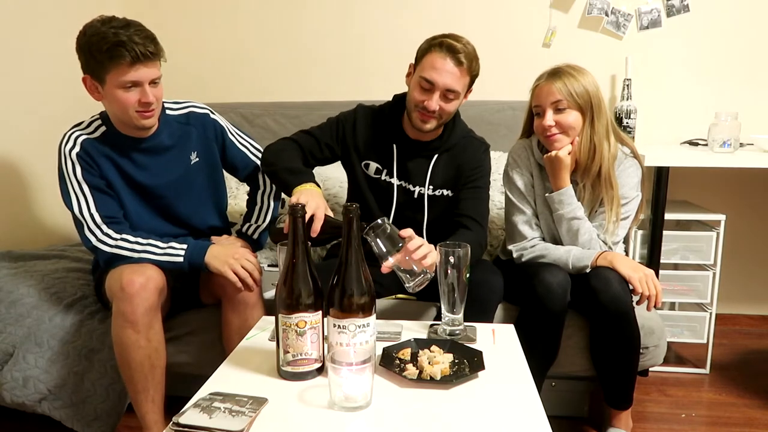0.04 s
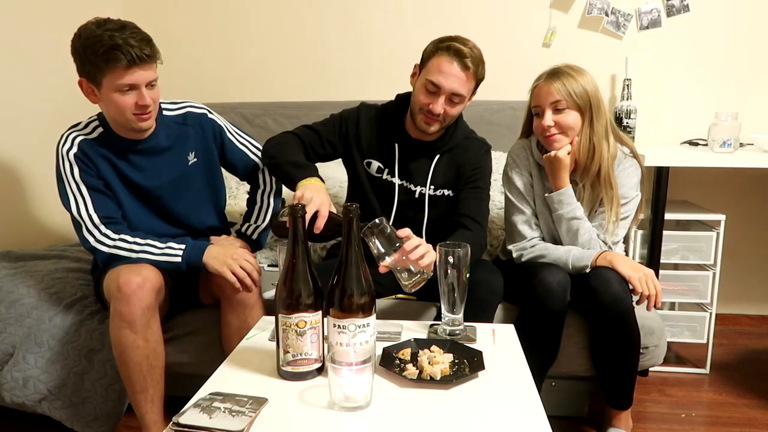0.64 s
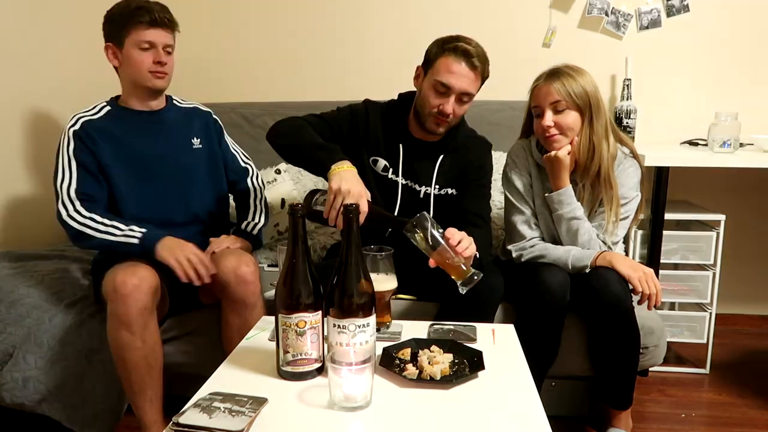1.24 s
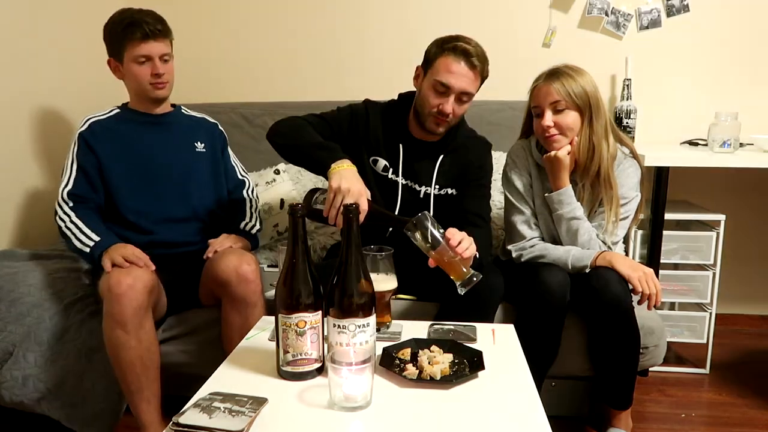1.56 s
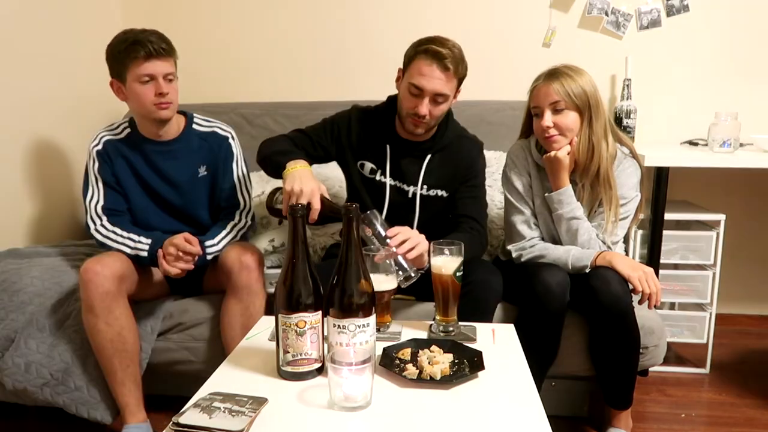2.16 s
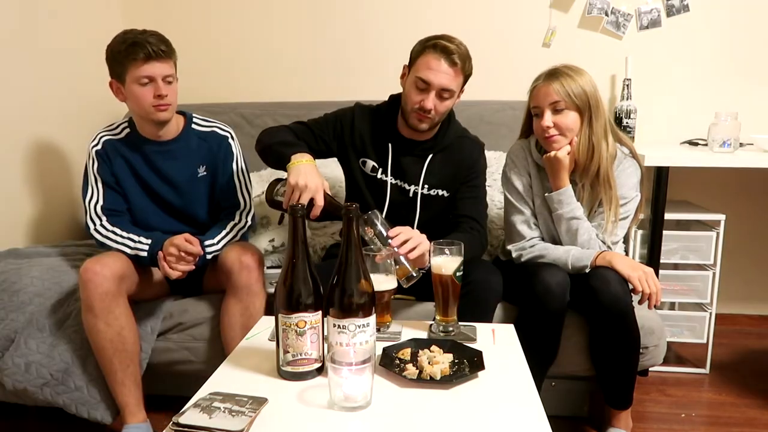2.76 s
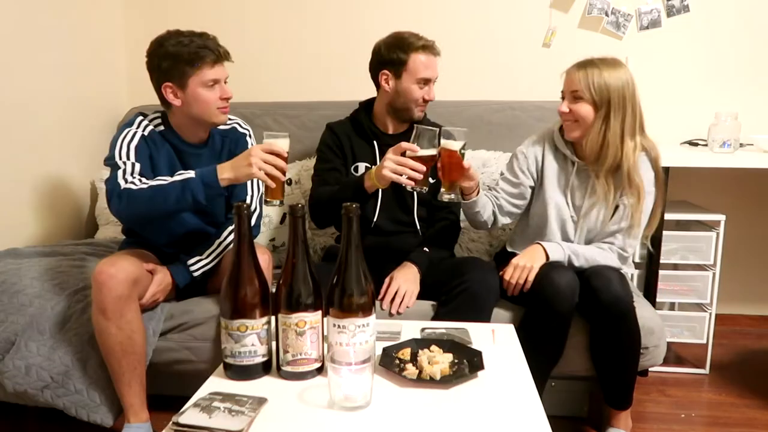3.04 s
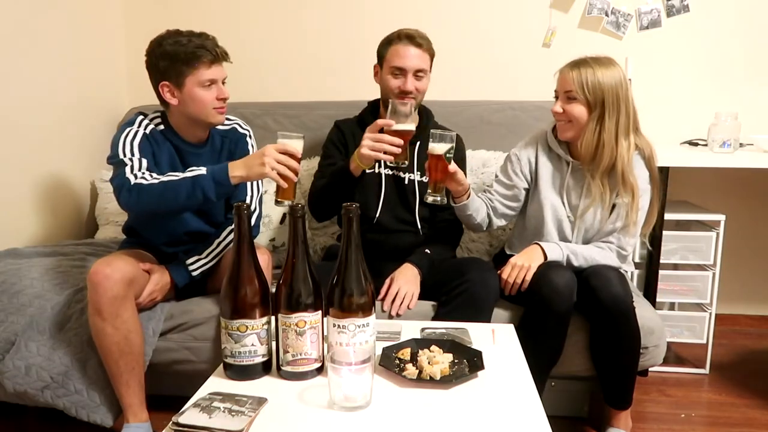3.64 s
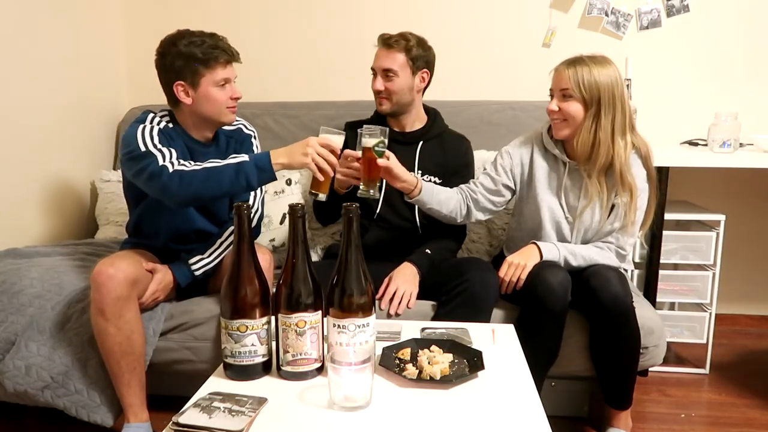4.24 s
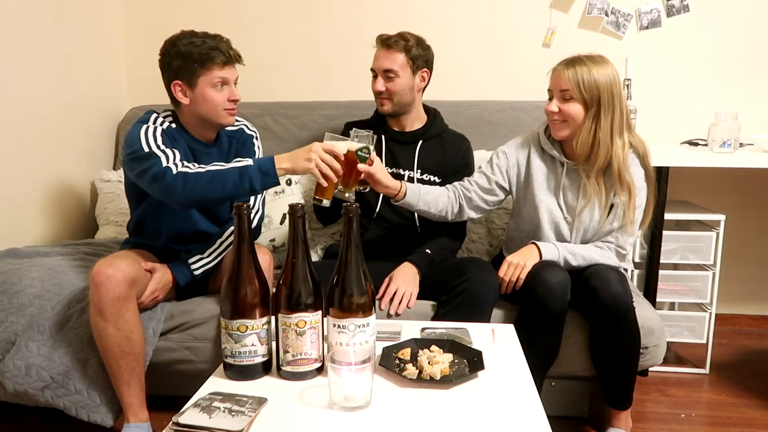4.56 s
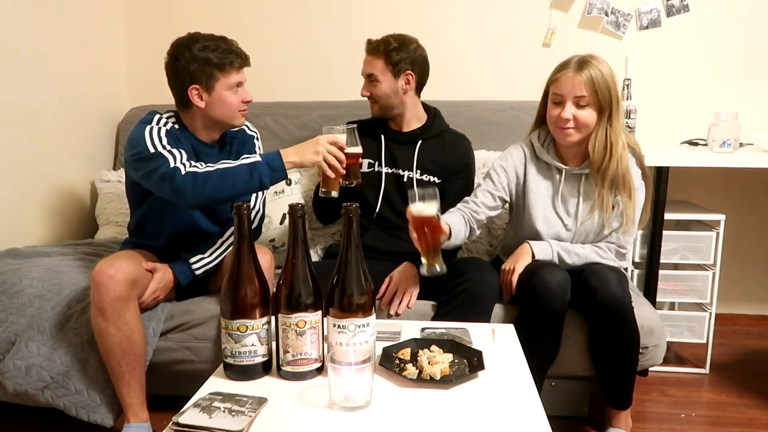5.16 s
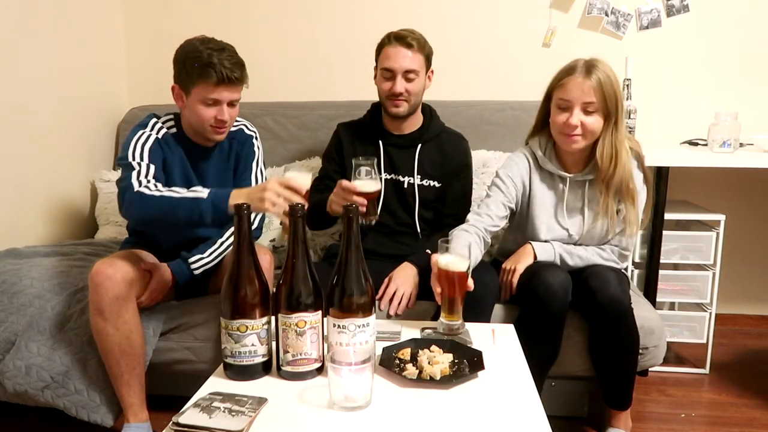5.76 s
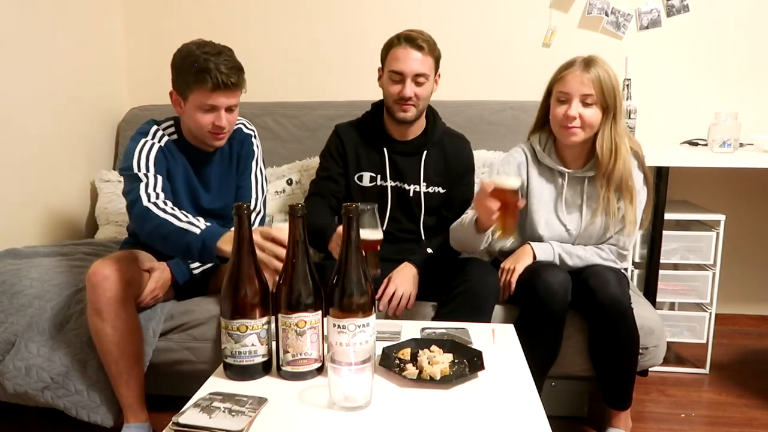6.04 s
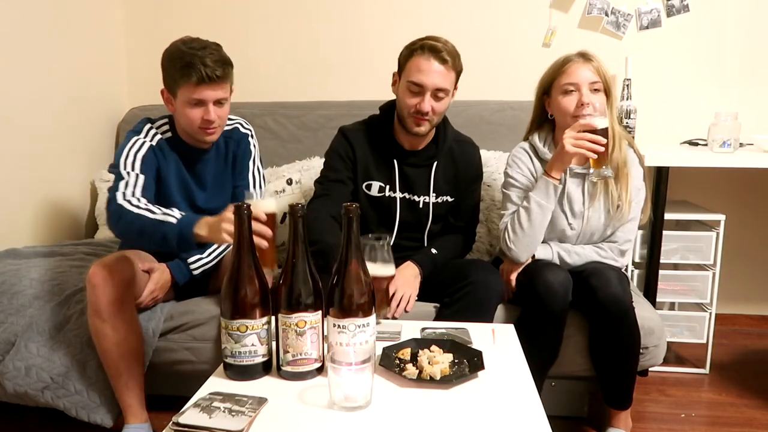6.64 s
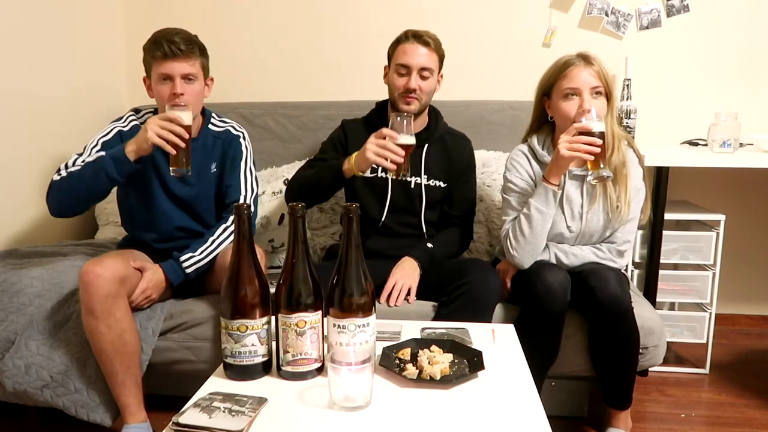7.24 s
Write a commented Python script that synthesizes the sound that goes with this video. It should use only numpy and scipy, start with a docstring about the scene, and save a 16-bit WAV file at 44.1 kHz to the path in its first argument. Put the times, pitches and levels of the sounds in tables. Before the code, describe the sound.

In a small living room with a short echo, a nearby microphone picks up a bottle ticking against a glass rim while beer glugs and fizzes softly. After one louder gulp, full beer glasses meet in a few short clinks, two of them almost together. Then the glasses land on a table in three heavy knocks. A faint hiss and hum lie underneath.

```python
"""Three full beer glasses clink in a toast, their ring damped by hands and beer, and are then set down
one by one on a low table that knocks and booms. Before that, the beer is poured: the bottle neck taps
the glass, gulps of air ring as bubbles, and the foam fizzes.
A small, lively living room answers every blow; under it all lies a faint hiss and hum."""
import sys
import numpy as np
from scipy import signal
from scipy.fft import rfft, irfft, next_fast_len
from scipy.io import wavfile

SR = 44100
rng = np.random.default_rng(int(sys.argv[2]) if len(sys.argv) > 2 else 0)


def generate_wav(signal):
    """Clip the signal to [-1, 1] and save it as 16-bit WAV at the path in sys.argv[1]."""
    frames = np.transpose(np.atleast_2d(signal))
    scaled = np.clip(frames, -1, 1) * 32767
    pcm = np.round(scaled).astype(np.int16)
    wavfile.write(sys.argv[1], SR, pcm)


N = 321930
T = np.arange(int(.8 * SR)) / SR  # the seconds of one short sound
HZ = np.fft.rfftfreq(len(T), 1 / SR)


def amp(db):
    """Turn decibels into a gain."""
    return 10 ** (np.asarray(db) / 20)


def unit(x):
    """Scale to an average power of 1."""
    return x / np.sqrt(np.mean(x ** 2) + 1e-30)


def unit_energy(x):
    """Scale to an energy of 1 per channel."""
    return unit(x) / np.sqrt(x.shape[-1])


def fade(ring_s):
    """Die away by 60 dB in ring_s seconds."""
    return np.exp(-np.log(1000) * T / max(ring_s, 1e-3))


def along(points, hz):
    """Read a curve of (pitch, value) points at hz."""
    pitches, values = np.transpose(points)
    return np.interp(np.log(hz + 1), np.log(pitches), values)


def coloured(x, tone):
    """Make each pitch louder or softer along a tone curve."""
    return irfft(rfft(x) * amp(along(tone, np.fft.rfftfreq(x.shape[-1], 1 / SR))), x.shape[-1])


def spread(pair, width):
    """Mix two unrelated signals into left and right; more side sounds wider."""
    side_gain = amp(along(width, np.fft.rfftfreq(pair.shape[-1], 1 / SR)))
    shares = np.array([np.ones_like(side_gain), side_gain]) / np.hypot(1, side_gain)
    middle, side = irfft(rfft(pair) * shares, pair.shape[-1])
    return np.array([middle + side, middle - side])


# the tone of the hiss: pitch_hz, level_db
HISS_TONE = [(20, -1.5), (45, 0), (70, 0.5), (100, -1), (150, -1.5), (330, 0), (700, -6), (1400, -9),
             (2800, -13), (5600, -19.5), (10000, -27), (13500, -31), (15500, -56.5)]
# how wide the hiss is: pitch_hz, side_db
HISS_SPREAD = [(60, -20), (200, -1.5), (700, 1.5), (2400, 1.5), (15000, 0.5)]
# mains hum and a thin electronic whistle: pitch_hz, level_db
HUM_TONES = [(100.5, -81), (13010, -99)]
def background(hiss_db=-64.0):
    """Steady room noise with a faint hum."""
    hiss = unit(coloured(spread(rng.standard_normal((2, N)), HISS_SPREAD), HISS_TONE))
    hum = sum(amp(db) * np.sqrt(2) * np.sin(2 * np.pi * (hz * np.arange(N) / SR + rng.random()))
              for hz, db in HUM_TONES)
    return amp(hiss_db) * hiss + hum


# how long the room echoes: pitch_hz, ring_s
ROOM_RING = [(80, 0.65), (210, 0.34), (560, 0.43), (1470, 0.48), (3880, 0.48), (10200, 0.36), (15000, 0.24)]
# how wide the room sounds: pitch_hz, side_db
ROOM_SPREAD = [(100, -35), (500, -26), (1400, -17), (2800, -10), (4200, -6.5), (6500, 0), (10000, 3.5),
               (15000, 14.5)]
def room(direct_db, early_db=-3, early_s=0.22, low_hz=85):
    """Sound arrives directly, then off the table and near walls, then as a smooth tail."""
    hz, t, bands = signal.stft(rng.standard_normal((2, len(T))), SR, nperseg=256)
    bands = bands * np.exp(-np.log(1000) * t / along(ROOM_RING, hz)[:, None])
    tail = signal.istft(bands, SR, nperseg=256)[1][:, :len(T)]
    early = rng.standard_normal((2, len(T))) ** 3 * fade(early_s)
    echoes = unit_energy(tail) + amp(early_db) * unit_energy(early)
    answer = spread(echoes * (1 - np.exp(-T / 0.00031)), ROOM_SPREAD)
    answer[:, 0] += amp(direct_db)
    # Small things give off hardly any deep bass.
    bass_cut = signal.butter(2, low_hz, "high", fs=SR, output="sos")
    return unit_energy(signal.sosfilt(bass_cut, answer))


# moments when whatever rings stops dead: time_s
STOPS = [2.05, 3.015]
def in_room(start_s, db, sound, direct_db=-7):
    """Play one short sound from its own spot in the room, up to the next stop."""
    start = max(round(start_s * SR), 0)
    end = min([start + len(T), N] + [round(stop_s * SR) for stop_s in STOPS if stop_s > start_s])
    heard = signal.fftconvolve(sound[None], room(direct_db), axes=1)
    out = np.zeros((2, N))
    out[:, start:end] = amp(db) * heard[:, :end - start]
    return out


def ring(tones, pitch=1, slosh=0, slosh_hz=150):
    """A struck thing rings with fading tones; grip and moving beer (slosh) make them waver."""
    times = np.arange(1000) / slosh_hz
    out = np.zeros(len(T))
    for hz, db, ring_s in tones:
        waver = slosh * np.sqrt(hz / 3000) * np.interp(T, times, rng.standard_normal(len(times)))
        out += amp(db) * unit_energy(np.sin(2 * np.pi * hz * pitch * T + waver) * fade(ring_s))
    return out


def contact(tone, thud_db, crack_db, tick_db, smear_s=0.001906, points=130):
    """The click of a blow: a soft one adds thud, a hard one crack and tick."""
    pitches = np.linspace(0, SR / 2, points)
    tilt = along([(500, thud_db), (1300, 0.0054), (2800, crack_db), (6500, tick_db)], HZ)
    # Countless brief high tones make the treble uneven.
    depth_db = 6 * along([(3000, 0.11), (8000, 0.75)], HZ)
    ripple = depth_db * np.interp(HZ, pitches, rng.standard_normal(points))
    spectrum = unit(amp(along(tone, HZ))) * amp(tilt + ripple)
    # Fold the click so that nothing sounds before the blow.
    folded = irfft(np.log(spectrum + 1e-6))
    folded[1:len(T) // 2] *= 2
    folded[len(T) // 2 + 1:] = 0
    # Waves of different pitch leave the glass at slightly different times.
    delay_s = smear_s * np.interp(HZ, pitches, rng.random(points) ** 2)
    click = irfft(np.exp(rfft(folded) - 2j * np.pi * np.cumsum(delay_s) * HZ[1]))
    return click * (T < .1)


# a soft bump as the bottle is tilted: start_s, level_db, pitch_hz, ring_s
TILT_BUMPS = [(1.672, -50, 85, 0.042)]
def bump(gain_db=24):
    """A dull, low push without any click."""
    return sum(in_room(start_s, db + gain_db, ring([(hz, 0, ring_s)]))
               for start_s, db, hz, ring_s in TILT_BUMPS)


def fizz(spiky=0.68, pops_per_s=9000):
    """Tiny bubbles burst in the foam, soft and dense."""
    pops = rng.standard_normal((2, N)) * np.exp(spiky * rng.standard_normal(N))
    pops *= rng.random(N) < pops_per_s / SR
    tone = [(200, -14), (700, -7), (1500, -9), (4000, 7), (8000, 1), (13000, -2), (16000, -14)]
    return unit(coloured(spread(pops, ROOM_SPREAD), tone))


def bubble(hz, attack_s=0.0019, glide=0.083, settle_s=0.0096):
    """A pocket of air rings and sinks to its final pitch; small, high ones die sooner."""
    clock = T + glide * settle_s * (1 - np.exp(-T / settle_s))
    ring_s = 0.044 * (hz / 1000) ** -0.56
    return unit_energy(np.sin(2 * np.pi * hz * clock) * fade(ring_s) * (1 - np.exp(-T / attack_s)))


# surges of beer in the glass: start_s, length_s, fizz_db, bubbles_db
BEER_SURGES = [(1.388, 0.33, -74.5, -54), (1.821, 0.25, -71.5, -50), (2.642, 0.27, -68.5, -53.5),
               (3.045, 0.17, -72.5, -83)]
def pouring(gain_db=24, count=22, bubble_hz=2362, scatter_octaves=0.241):
    """Each surge swells and ebbs: the foam fizzes with it, and small bubbles crowd at its height."""
    out, foam = np.zeros((2, N)), fizz()
    for start_s, length_s, fizz_db, bubbles_db in BEER_SURGES:
        flow = np.sin(np.pi * np.clip((np.arange(N) / SR - start_s) / length_s, 0, 1))
        births = length_s * np.arccos(1 - 2 * (np.arange(count) + rng.random(count)) / count) / np.pi
        pitches = bubble_hz * 2 ** (scatter_octaves * rng.standard_normal(count))
        swarm = sum(np.pad(bubble(hz), (round(born_s * SR), 0))[:len(T)]
                    for born_s, hz in zip(births, pitches))
        out += amp(fizz_db) * flow * foam + in_room(start_s, bubbles_db + gain_db, unit_energy(swarm))
    return out


# a splash, coloured by the air in the glass: pitch_hz, level_db
SPLASH_TONE = [(200, -39), (700, 14), (1100, 2), (1600, 9.5), (2100, 3.5), (2600, -0.5), (4000, -11),
               (12000, -26)]
# gulps of air and large bubbles: start_s, level_db, pitch_hz
GULPS = [(0.362, -50.5, 505), (0.859, -53.5, 468), (1.065, -54, 1450), (1.442, -53, 1643),
         (1.521, -53, 667), (1.584, -49, 821), (1.835, -53, 1800), (2.780, -50, 1824), (2.794, -48, 630),
         (2.855, -34, 608), (2.955, -46, 1510)]
def glugs(gain_db=24, splash_db=-23, splash_growth=0.75):
    """Each gulp is one bubble with a little splash; in a big gulp the bubble stands out more."""
    out = np.zeros((2, N))
    for start_s, db, hz in GULPS:
        noise = coloured(rng.standard_normal(len(T)), SPLASH_TONE)
        splash = unit_energy(noise * fade(0.081) * (1 - np.exp(-T / 0.0074)))
        gulp = amp(db) * bubble(hz) + amp(splash_growth * db + splash_db) * splash
        out += in_room(start_s, gain_db, gulp)
    return out


# the tone of glass hitting glass: pitch_hz, level_db
CLACK_TONE = [(35, -72), (220, -15), (340, -2.5), (500, 8), (700, 3.5), (880, -7), (1120, 1), (2000, 0),
              (3500, -6), (5000, -4), (6000, -3.5), (8000, -8), (12500, -10), (15500, -21)]
def clack(thud_db, crack_db, tick_db):
    """The dead click of glass held in a hand."""
    return contact(CLACK_TONE, thud_db, crack_db, tick_db)


# the ring of bottle and empty glass: pitch_hz, level_db, ring_s
NECK_TONES = [(513.3, -3, 0.17), (1017.5, -3.5, 0.14), (1535, -14.5, 0.041), (1885, -16, 0.065),
              (2770, -42, .1), (2928, -9.5, 0.17), (4427, -10, 0.039), (6504, -16.5, 0.042),
              (10220, -27.5, 0.098), (11600, -26, .1)]
# neck on rim: start_s, level_db, thud_db, tick_db, ring_db, pitch_factor, bright_db_per_octave
NECK_TAPS = [(0.001, -26, 1, -14, 2, 1.025, 1), (0.544, -48.5, -9, -21, 0.5, 1.018, -1.5),
             (0.639, -50, -15, -14, -2.5, 1.018, -1.5), (1.087, -34, -13.5, -15.5, -1, 1.012, 2)]
def bottle_taps(gain_db=21):
    """The neck touches the rim: light touches ring duller, and the pitch sinks as the glass fills."""
    out = np.zeros((2, N))
    for start_s, db, thud_db, tick_db, ring_db, pitch, bright in NECK_TAPS:
        tones = [(hz, level_db + bright * np.log2(hz / NECK_TONES[1][0]), ring_s)
                 for hz, level_db, ring_s in NECK_TONES]
        tap = clack(thud_db, -3, tick_db) + amp(ring_db) * ring(tones, pitch, slosh=0.61)
        out += in_room(start_s, db + gain_db, tap)
    return out


# the knock of a glass foot on the table: pitch_hz, level_db
KNOCK_TONE = [(30, -64), (70, -6), (200, -9), (280, -0.5), (550, 3), (800, 6), (1150, 4), (1600, 1),
              (2100, -8.5), (3150, -10.5), (3500, -18.5), (5500, -25.5), (8000, -35), (12000, -44.5),
              (15000, -60)]
# the ring of table top and glass foot: pitch_hz, level_db, ring_s
TABLE_TONES = [(149, -16.5, 0.16), (475, -18, 0.1), (747, -10, 0.047), (894, -13, 0.022), (1072, -11, 0.06),
               (1230, -7, 0.028), (2607, -20.5, 0.066), (2980, -17.5, 0.052), (3080, -17.5, 0.057)]
# the low boom of the whole board: pitch_hz, level_db, ring_s
BOOM_TONES = [(71, -8, 0.094), (218, -3, 0.079)]
# a glass is put down: start_s, level_db, thud_db, crack_db, tick_db, ring_db, boom_db, rock_db
LANDINGS = [(1.914, -50, 14, 15.5, 16, -0.5, -3, -9), (5.732, -19, -7, 0, -7.5, -1, -11, -24),
            (6.334, -19, -1.5, 3.5, 4, -12, -3, -8.5), (6.562, -20, -4.5, 2.5, 3.5, -1.5, -12, -9.5)]
def set_down(gain_db=23, rock_s=0.0175, rock_loss_db=6):
    """A heavy glass foot knocks on the table, rocks, and lands twice more, each time weaker."""
    out = np.zeros((2, N))
    for start_s, db, thud_db, crack_db, tick_db, ring_db, boom_db, rock_db in LANDINGS:
        for k, landing_db in enumerate([0, rock_db, rock_db - rock_loss_db]):
            knock = contact(KNOCK_TONE, thud_db, crack_db, tick_db)
            blow = knock + amp(ring_db) * ring(TABLE_TONES) + amp(boom_db) * ring(BOOM_TONES)
            out += in_room(start_s + k * rock_s, db + landing_db + gain_db, blow, direct_db=-5.5)
    return out


# the ring of the three full glasses, one list each: pitch_hz, level_db, ring_s
GLASS_TONES = [
    [(1043, -6, 0.24), (1950, -9.5, .12), (2705, -10, 0.65), (3090, -4.5, 0.029), (3950, -13, 0.082),
     (4580, -40, .15), (6710, -16, 0.054), (7300, -19, 0.48)],
    [(2210, -21, 0.0093), (2783, -5, 0.12), (2740, -4, 0.0135), (3440, -22, 0.1), (3605, -4.5, 0.0082),
     (4437, -1.5, 0.093), (4470, -11, 0.37), (5480, -18.5, 0.0137), (7590, -18, 0.066)],
    [(1025, -15.5, 0.69), (1557, -8, 0.055), (1785, -7.5, 0.036), (2670, -11.5, 0.17), (2956, -8, 0.055),
     (3820, -2.5, 0.18), (3915, -8, 0.13), (4300, -17, 0.34), (6070, -12, .12)],
]
# rim on rim: start_s, level_db, thud_db, crack_db, tick_db, direct_db, glass1_db, glass2_db, glass3_db
RIM_CLINKS = [(3.305, -36.5, 5, -24, 1.5, -12.5, -4, -14.5, -36),
              (4.539, -30, 3, -8, 1.5, -10.5, -8.5, -4.5, -38),
              (4.620, -22.5, -11.5, 7.5, -6, -6, -24, 0.5, -42),
              (5.154, -31.5, 4, 2, 4, -13.5, -4, -11, 3.5)]
def toast(gain_db=22):
    """Each clink is a clack plus ringing glasses; direct_db is what gets straight past the hands."""
    out = np.zeros((2, N))
    for start_s, db, thud_db, crack_db, tick_db, direct_db, *glass_dbs in RIM_CLINKS:
        rings = sum(amp(glass_db) * ring(tones, slosh=1.0)
                    for glass_db, tones in zip(glass_dbs, GLASS_TONES))
        out += in_room(start_s, db + gain_db, clack(thud_db, crack_db, tick_db) + rings, direct_db)
    return out


def scene():
    """The beer is poured, the glasses clink, and they are set down."""
    return bottle_taps() + glugs() + pouring() + bump() + toast() + set_down() + background()


def record(dry, top_hz=15300):
    """Take away the very highest treble."""
    size = next_fast_len(N + SR // 2)
    kept = np.fft.rfftfreq(size, 1 / SR) < top_hz
    return irfft(rfft(dry, size) * kept, size)[:, :N]


dry = scene()
out = record(dry)
generate_wav(out)
```